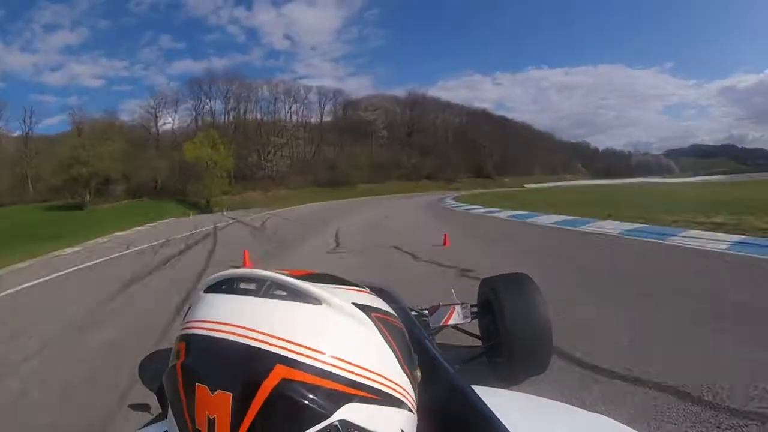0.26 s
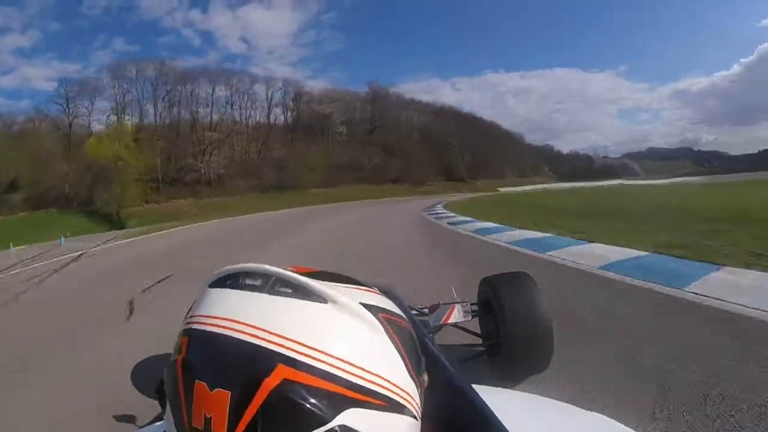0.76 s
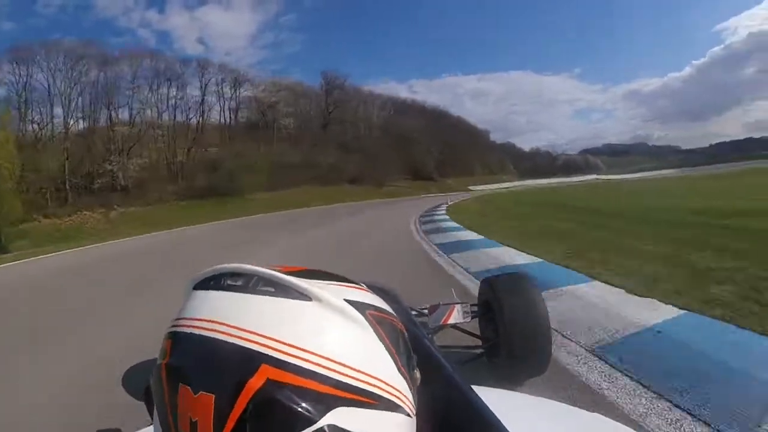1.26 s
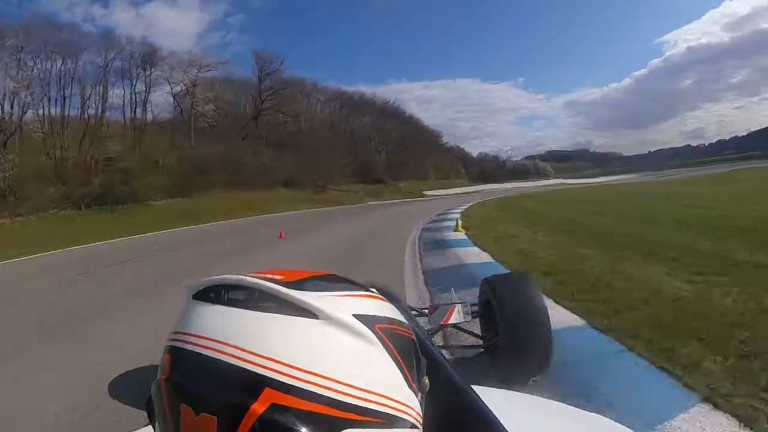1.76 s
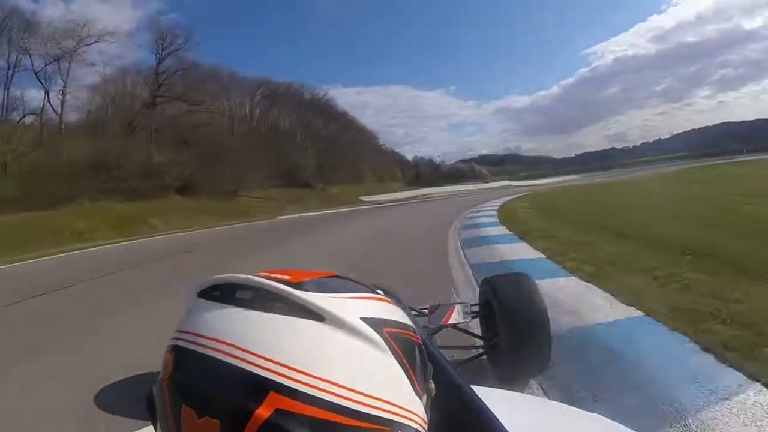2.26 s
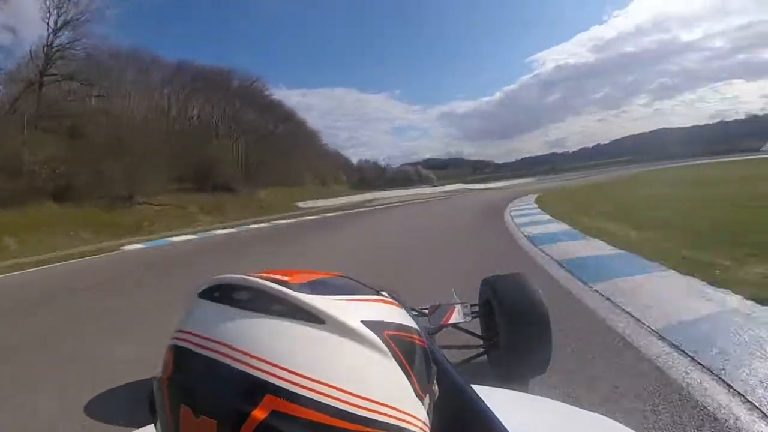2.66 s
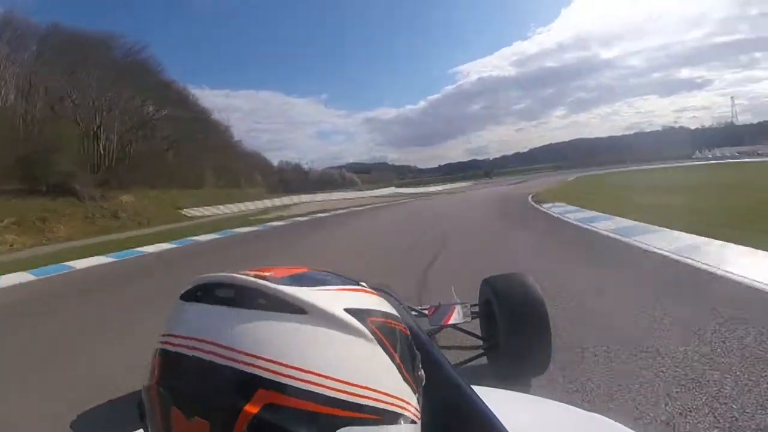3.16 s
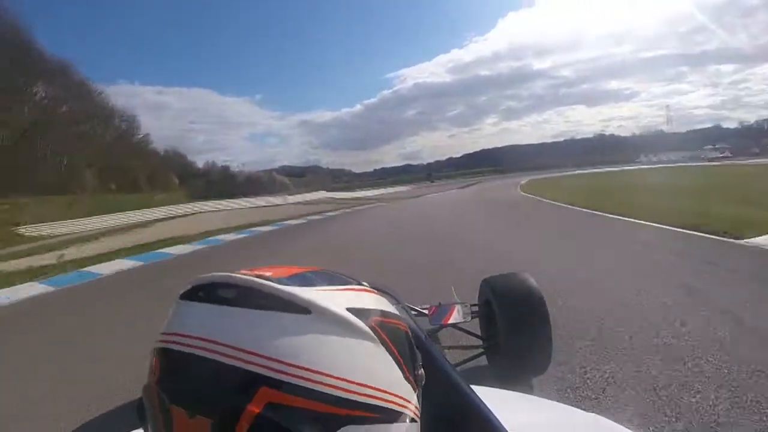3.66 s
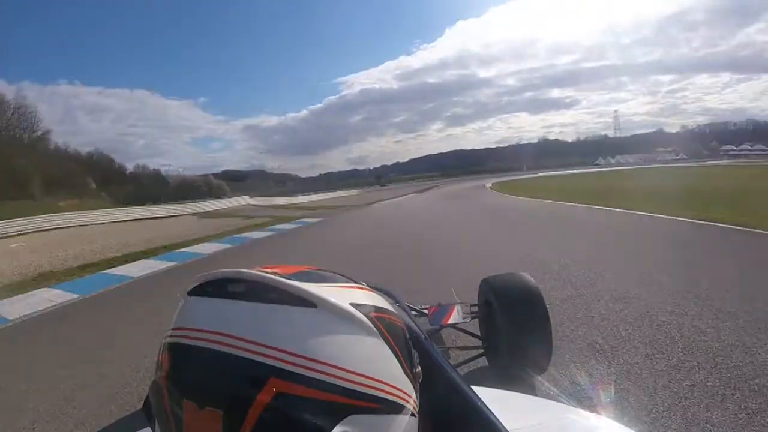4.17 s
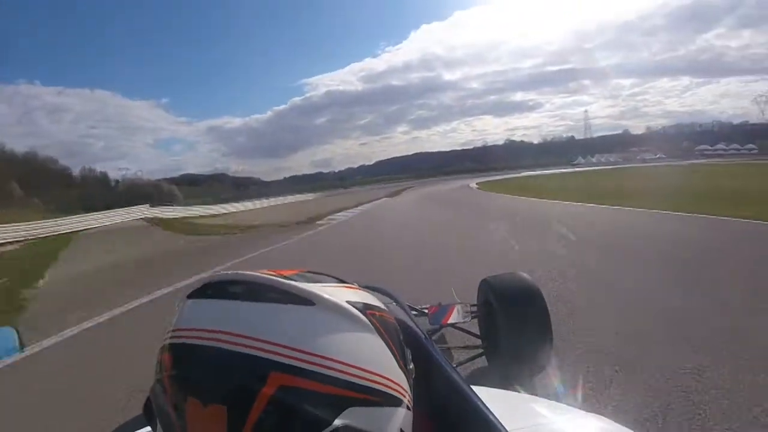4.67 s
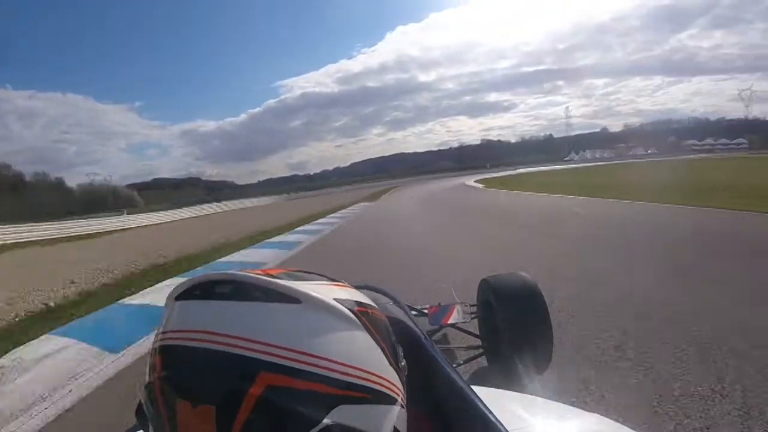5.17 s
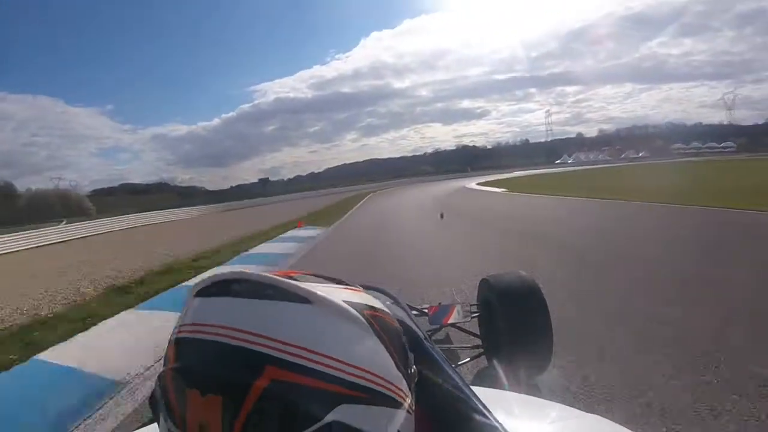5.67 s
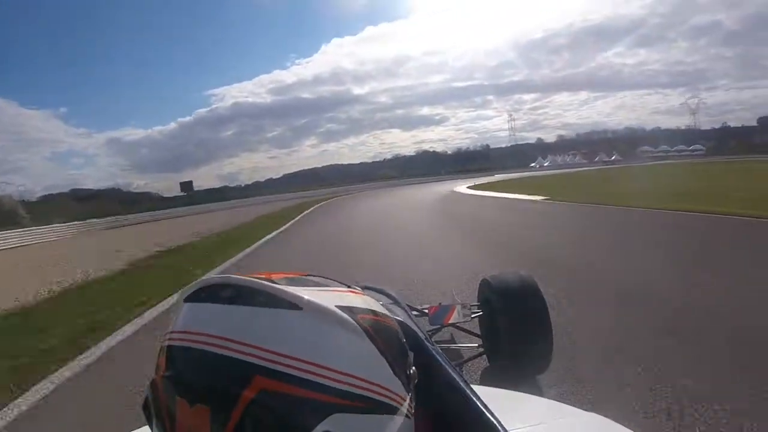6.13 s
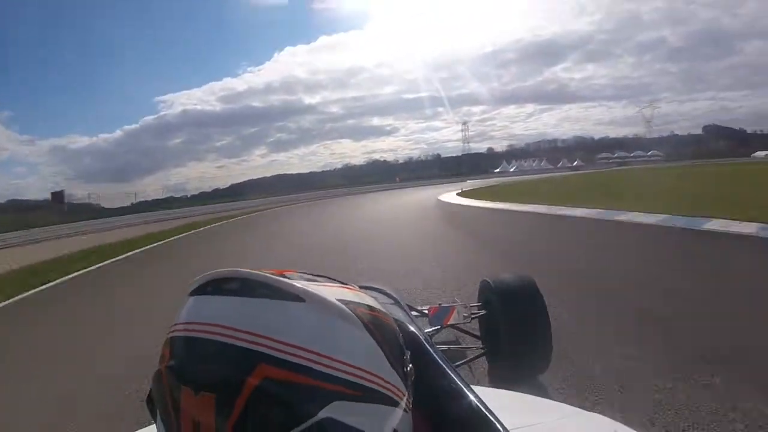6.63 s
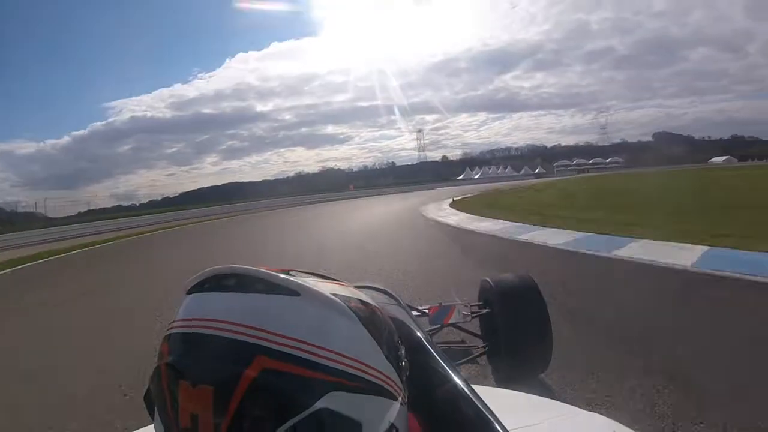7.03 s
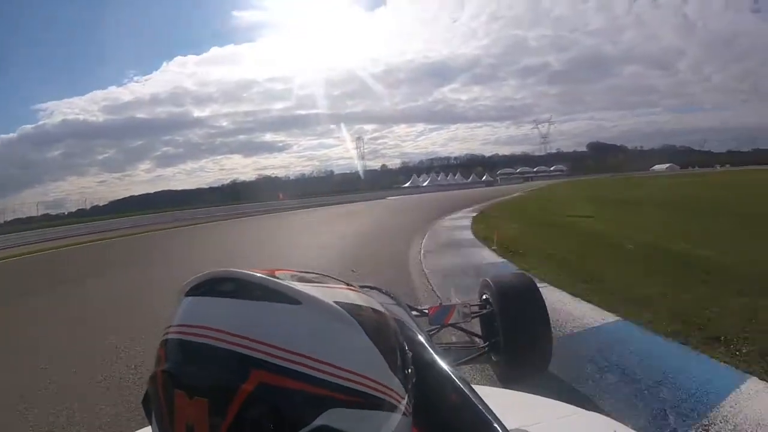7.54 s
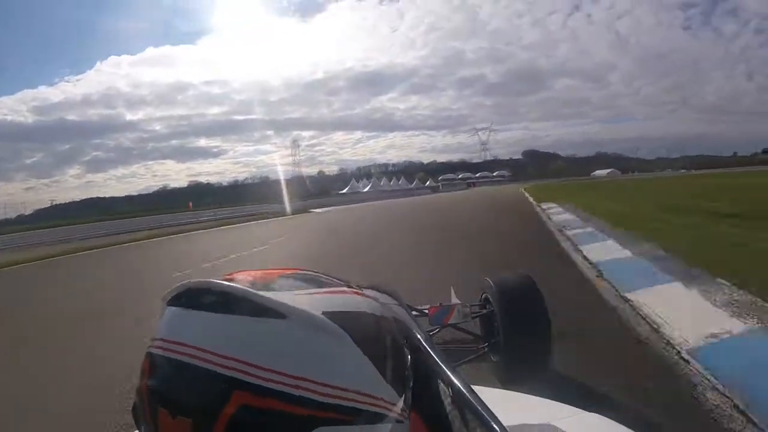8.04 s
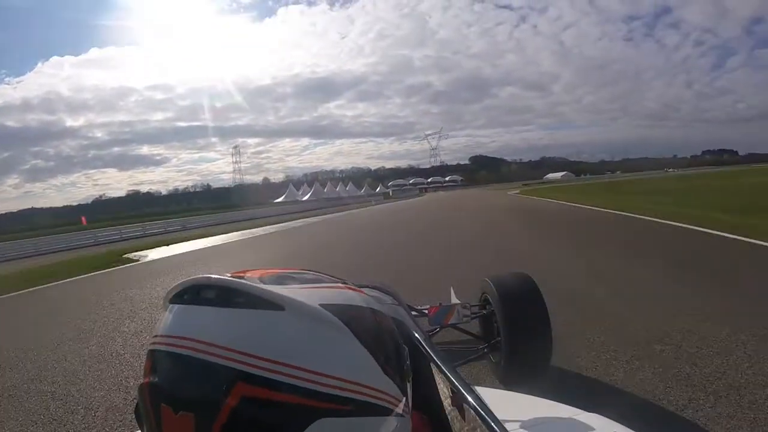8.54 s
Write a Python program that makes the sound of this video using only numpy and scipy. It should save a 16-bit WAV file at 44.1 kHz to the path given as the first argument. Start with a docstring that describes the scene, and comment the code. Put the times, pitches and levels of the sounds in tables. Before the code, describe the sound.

Air tears and buffets past a microphone behind the cockpit of a racing car lapping a circuit. The low engine note sags in a corner amid knocks, small ticks and a faint sizzle of tyre on kerb, then rises with a growl as the car gathers speed. Off the throttle it sinks into a deep, burbling boom for the next bend, before pulling again with a thin gear whine.

```python
"""On board an open-wheel racing car. It starts in a bend: the four-cylinder engine drones, swirling air
tears past the camera housing, tyres scrub and bumps thump the chassis. Short ticks come now and then, a
panel sings at low revs (1 s) and a tyre sizzles on the kerb. The engine growls as the car speeds up.
At 5.5 s the driver lifts off, and the exhaust booms and burbles while the revs fall. Near 7.8 s the
throttle opens again with a short swish, and the growl returns."""
import sys
import numpy as np
from scipy import signal
from scipy.fft import rfft, irfft
from scipy.io import wavfile
from scipy.ndimage import uniform_filter1d, minimum_filter1d

SR = 44100
rng = np.random.default_rng(int(sys.argv[2]) if len(sys.argv) > 2 else 0)


def waveform_to_disk(signal):
    """Save audio, clipped to [-1, 1], as 16-bit WAV at the path in sys.argv[1]."""
    frames = np.transpose(np.atleast_2d(signal))
    scaled = np.clip(frames, -1, 1) * 32767
    samples = np.round(scaled).astype(np.int16)
    wavfile.write(sys.argv[1], SR, samples)


N = 388080
TIME = np.arange(N) / SR

# Engine speed, as firings per second: time_s, firing_hz
ENGINE_SPEED = [(0, 91), (.15, 90.24), (.5, 81.67), (.9, 79.8), (1.35, 79.44), (1.9, 83.26), (2.6, 85.73),
                (3.35, 89.4), (4, 94.6), (4.25, 97.03), (5.32, 107.1), (5.53, 102.4), (5.67, 107.2),
                (5.83, 100.9), (6.1, 98.55), (6.5, 94.64), (7.15, 88.6), (7.8, 86.2), (8.1, 88.25),
                (8.5, 91.05), (8.8, 93.2)]
# The exhaust's deep note, before coasting adds to it: time_s, level_db
BOOM_LEVEL = [(0, -20), (.25, -25.5), (2.3, -24.5), (2.95, -31), (3.15, -20), (3.62, -23), (3.8, -18.5),
              (4.35, -17.7), (4.8, -19.5), (5.5, -18.5), (6.6, -20.5), (7.65, -21), (7.83, -22), (7.9, -26),
              (8.03, -20.5), (8.55, -23), (8.8, -22.5)]
# Presses of the throttle: start_s, end_s, rise_s, fall_s, growl_db, honk_db, rasp_db, flutter_rad
THROTTLE_PULLS = [(-.1, 0.053, 0.092, 0.15, -36.5, -44, -38, .3),
                  (.85, 3.5, 0.82, 0.3, -32.5, -40, -28, 0.62),
                  (3.58, 4.34, 0.14, 1.3, -28.5, -25.5, -30, .25),
                  (7.849, 8.8, 0.079, .2, -32.5, -26, -36, .15)]
# Tones of the growl, before the pipe shapes them: firing_multiple, level_db
GROWL_TONES = [(2.5, -12), (3, 1.5), (3.5, -7.5), (4, -5), (5, -4), (5.5, -11), (6, -4.5), (7, -12),
               (8, -12), (9, -14.5), (13, -15.5)]
# Pitches at which the exhaust pipe rings: pitch_hz, width_hz, gain_db
PIPE_RESONANCES = [(279, 53, 1), (411, 13, -4.5), (514.4, 9.8, 0.5), (570, 27, -3), (656, 52, -6),
                   (1110, 45, -1.5)]
# Tone colour of the gas leaving the pipe: pitch_hz, level_db
GAS_SPECTRUM = [(100, -23.5), (180, -2.5), (280, 0.5), (390, 0), (470, -7), (560, -0.5), (700, -10.5),
                (960, -13.5), (1085, -4), (1160, -13.5), (1235, -8), (1400, -21), (2000, -35)]
# Loudness of the gear whine: time_s, level_db
GEAR_LEVEL = [(0, -42.5), (3, -44.5), (3.9, -36), (4.5, -45), (6, -40), (7.3, -41.5), (8.1, -38.5),
              (8.45, -30.5), (8.8, -28.5)]

# Strength of the air flowing over the car: time_s, level_db
AIRFLOW_LEVEL = [(0, -1.5), (.16, -0.5), (.178, -7.5), (1, -8), (2, -4.5), (3.1, -0.5), (5.1, -1),
                 (5.4, -3), (6.3, -3), (6.9, -7), (7.75, -6), (8.8, -0.5)]
# Gusts and lulls: middle_s, half_length_s, rumble_change_db, buffet_change_db, rush_change_db
WIND_GUSTS = [(0.707, 0.52, 2.5, 0, -2), (1.5, 0.39, -0.5, -1.5, 0), (2.6, .3, -1.5, .5, 1),
              (3.2, 0.13, -2, 2, 1.5), (3.56, 0.17, 5.5, -0.5, 2.5), (4.2, .12, -1.5, -3, 0),
              (4.63, 0.2, -0.5, -1, 1.5), (5.107, 0.15, -3.5, 1, 3.5), (5.62, 0.27, 2.5, 0.5, 2.5),
              (6.4, .35, 2, -0.8, -1), (7.398, 0.52, 0, -2, .8), (8.3, .3, -1, -2.5, 0),
              (8.718, 0.1, 3, 1, 1)]
# Hiss at the front of the housing: time_s, level_db
HISS_LEVEL = [(0, -51), (.16, -57), (.25, -63), (.6, -69), (1, -76), (2, -66), (3, -62.5), (5.2, -61.5),
              (5.7, -54.5), (7.75, -57), (7.95, -50.5), (8.8, -47)]
# Tone colours of the five wind layers, lowest first: pitch_hz, level_db
RUMBLE_SPECTRUM = [(12, -30), (24, -2.5), (38, 5.5), (60, 4), (80, 8), (110, 0.5), (160, -4.5),
                   (300, -43.5)]
BUFFET_SPECTRUM = [(60, -18.5), (120, 1.5), (165, 0), (230, 0), (290, -3.5), (400, -5.5), (520, -8),
                   (700, -13), (1100, -26), (2500, -70.5)]
ROAR_SPECTRUM = [(250, -37), (500, 0.5), (750, 3), (1100, 1), (1600, -3), (2200, -11.5), (3000, -20),
                 (4500, -34), (8000, -74.5)]
RUSH_SPECTRUM = [(1000, -17.5), (1900, 4.5), (2600, 2), (3300, -1.5), (4200, -8), (5100, -5), (5550, -7.5),
                 (5830, -16), (6040, -34), (6250, -16.5), (6520, -8), (7050, -16.5), (8200, -25.5),
                 (9300, -38.5), (10000, -52)]
HISS_SPECTRUM = [(2000, -20), (3600, -9), (4300, -12.5), (5100, -1), (6400, -4.5), (7500, -7), (8500, -17),
                 (9500, -29.5), (11000, -38)]
# Hollows in the bodywork that ring in the wind: pitch_hz, width_hz, level_db
BODY_HOLLOWS = [(402, 24, -38), (520, 16, -44.5), (1070, 79, -52.5)]

# A tyre runs on the kerb: start_s, end_s, rise_s, fall_s, level_db
KERB_TOUCHES = [(1.372, 1.451, 0.054, 0.16, -56), (1.55, 2.95, 0.24, .7, -53)]
# Bumps that jolt the car: time_s, thump_db, knock_db, rattle_db
BUMPS = [(0.108, -5, -12.5, -36), (0.126, -14.5, -23, -45), (.151, -11.5, -12, -45),
         (0.18, -21.5, -29.5, -17.5), (0.214, -23.5, -10, -23), (0.216, -26, -7.5, -26),
         (0.2195, -14.5, -4, -25), (0.613, -7.5, -19, -24), (.677, -35, -31, -26), (0.735, -15, -34, -60),
         (.851, -22.5, -13, -41), (1.149, -33.5, -15, -22), (1.202, -30.5, -30, -23),
         (1.229, -30.5, -18, -27), (1.366, -8.5, -34, -32), (2.126, -8, -24, -43), (4.486, -8, -20, -42),
         (8.052, -13, -15.5, -46)]
# Tone colours of the chassis, the camera mount and the loose parts: pitch_hz, level_db
THUMP_SPECTRUM = [(20, -11.5), (55, -6), (80, 13), (130, -8.5), (400, -16), (1000, -35), (3000, -51)]
KNOCK_SPECTRUM = [(60, -9.5), (200, 9), (700, -4.5), (1500, -14), (3000, -31.5), (5500, -36), (8000, -59)]
RATTLE_SPECTRUM = [(300, -0.5), (1000, 1), (2800, -2), (4200, -13)]
# Short ticks, some faint and very high: time_s, pitch_hz, peak_db
TICKS = [(.784, 2240, -27), (1.777, 2181, -26), (3.863, 6710, -38), (4.331, 7775, -37), (4.692, 1880, -20),
         (6.32, 1780, -22), (6.405, 6470, -42), (6.424, 6440, -38), (6.874, 1993, -26.5)]
# Tones of the singing panel: firing_multiple, level_db
PANEL_OVERTONES = [(7, 0), (10, -17), (13.2, -20), (23.9, -18.5)]
# The swish as the throttle opens: time_s, pitch_hz, level_db
SWISH_PATH = [(7.826, 6600, -62), (7.837, 6500, -41.5), (7.844, 6100, -38.5), (7.853, 5200, -39.5),
              (7.86, 3900, -45), (7.868, 2100, -40), (7.89, 1700, -49)]


def undb(db):
    """Turn decibels into a number to multiply by."""
    return 10 ** (np.asarray(db) / 20)


def unit(x):
    """Scale a signal to an average strength (rms) of 1."""
    return x / np.sqrt(np.mean(x ** 2))


def curves(table):
    """Join a timed table's points with lines: one value per sample for each column."""
    times, *columns = np.transpose(table)
    return [np.interp(TIME, times, column) for column in columns]


def held(start_s, end_s, rise_s, fall_s):
    """A fader from 0 to 1: rises from the start, holds, and falls after the end."""
    return np.clip((TIME - start_s) / rise_s, 0, 1) * np.clip(1 - (TIME - end_s) / fall_s, 0, 1)


def response(spectrum):
    """Turn a tone colour into a gain at every frequency, falling away above its last point."""
    hz, db = np.transpose(spectrum)
    bins = np.arange(N // 2 + 1) * SR / N + 1
    return undb(np.interp(np.log(bins), np.log(hz), db)) * np.minimum(hz[-1] / bins, 1) ** 4


def noise(spectrum):
    """Noise with the given tone colour, strength 1."""
    return unit(irfft(rfft(rng.standard_normal(N)) * response(spectrum), N))


def wander(rate_hz):
    """A smooth random wobble, strength 1, that changes about rate_hz times a second."""
    hz = np.arange(N // 2 + 1) * SR / N
    return unit(irfft(rfft(rng.standard_normal(N)) * np.exp(-(hz / rate_hz) ** 2), N))


def resonance(hz, width_hz):
    """Noise ringing around one pitch, strength 1."""
    bins = np.arange(N // 2 + 1) * SR / N
    return unit(irfft(rfft(rng.standard_normal(N)) / (1 + ((bins - hz) / width_hz) ** 2), N))


def tap(spectrum):
    """The sound of one sharp tap with the given tone colour, peak 1."""
    cepstrum = irfft(np.log(response(spectrum)), N)
    # keeping only the first half packs the energy at the start of the tap
    sound = irfft(np.exp(rfft(2 * cepstrum * (np.arange(N) < N // 2))), N)
    return sound / np.abs(sound).max()


def exhaust_boom(phase, coasting, cover, lumpy):
    """The firings make a deep note that swells off the throttle, more so when the engine cover rings."""
    level_db = curves(BOOM_LEVEL)[0] + coasting * (4.5 + 4.5 * cover)
    level_db += lumpy * np.cos(phase / 4)  # strong and weak cylinders come round every four firings
    level_db += (0.14 + 0.55 * lumpy) * wander(35)
    octave = undb(-25) * np.cos(2 * phase)
    return np.sqrt(2) * (np.sin(phase) + octave) * undb(level_db)


def throttle(shut_growl_db=-48):
    """How much growl, honk, rasp and flutter the pedal brings; the strongest pull wins."""
    growl, honk, rasp, flutter = undb(shut_growl_db), 0, 0, 0
    for *timing, growl_db, honk_db, rasp_db, flutter_rad in THROTTLE_PULLS:
        pedal = held(*timing)
        growl = np.maximum(growl, pedal * undb(growl_db))
        honk = np.maximum(honk, pedal * undb(honk_db))
        rasp = np.maximum(rasp, pedal * undb(rasp_db))
        flutter = np.maximum(flutter, pedal * flutter_rad)
    return growl, honk, rasp, flutter


def intake_honk(phase):
    """The air intake honks at twice the firing rate."""
    return np.sqrt(2) * np.sin(2 * phase + 0.09 * wander(7.6))


def exhaust_growl(phase, firing_hz, flutter_rad):
    """Wavering overtones of the firings; each swells as the revs carry it through a pipe resonance."""
    out = np.zeros(N)
    for multiple, db in GROWL_TONES:
        strength = np.sqrt(2) * undb(db + 1.4 * wander(5.9))
        tone = np.cos(multiple * phase + (0.1 + flutter_rad) * wander(14))
        pipe = sum(undb(gain_db) / (1 + ((multiple * firing_hz - hz) / width_hz) ** 2)
                   for hz, width_hz, gain_db in PIPE_RESONANCES)
        out += strength * tone * pipe
    return out


def exhaust_gas(phase, pulsing=0.91):
    """Each firing lets out a noisy puff of gas."""
    return unit(noise(GAS_SPECTRUM) * np.exp(pulsing * np.cos(phase)))


def gear_whine(phase, multiple=4.25):
    """The gears turn with the engine, so their whine follows the revs."""
    return np.sqrt(2) * np.cos(multiple * phase + 0.16 * wander(14)) * undb(curves(GEAR_LEVEL)[0])


def engine(phase, firing_hz, cover_hz=87.6, cover_width_hz=5.1, burble_db=-34.5):
    """The engine honks, growls and rasps when pulling; when coasting it booms more and burbles."""
    coasting = held(start_s=5.48, end_s=7.735, rise_s=0.19, fall_s=0.2)
    cover = 1 / (1 + ((firing_hz - cover_hz) / cover_width_hz) ** 2)  # 1 where the engine cover rings
    lumpy = coasting * (1 - cover)  # off the throttle the firings are lumpy until the revs settle
    growl_gain, honk_gain, rasp_gain, flutter_rad = throttle()
    boom = exhaust_boom(phase, coasting, cover, lumpy)
    honk = intake_honk(phase) * honk_gain
    growl = exhaust_growl(phase, firing_hz, flutter_rad) * growl_gain
    unevenness = undb(wander(49))  # no two firings are equally strong
    gas = exhaust_gas(phase) * (rasp_gain + undb(burble_db) * lumpy)
    return boom + (honk + growl + gas) * unevenness


def wind():
    """Big swirls of air rumble and buffet the housing, small ones roar and hiss, and hollows ring."""
    flow_db, = curves(AIRFLOW_LEVEL)
    rumble_db = -22 + 0.38 * flow_db
    buffet_db = -22 + 0.83 * flow_db
    roar_db = -28 + flow_db
    rush_db = -36.5 + flow_db
    rush_db -= np.interp(TIME, [5.38, 5.72], [0, 9.5])  # fades as the car turns into the second bend
    for middle_s, half_length_s, low_db, middle_db, high_db in WIND_GUSTS:
        gust = np.exp(-((TIME - middle_s) / half_length_s) ** 2)
        rumble_db += low_db * gust
        buffet_db += middle_db * gust
        roar_db += 0.25 * high_db * gust
        rush_db += high_db * gust
    swirls = 0.89 * wander(28) + 0.9 * wander(220)  # shared, so four layers flicker together
    rumble = noise(RUMBLE_SPECTRUM) * undb(rumble_db + 2.1 * wander(30))
    buffet = noise(BUFFET_SPECTRUM) * undb(buffet_db + 1.3 * swirls + 0.5 * wander(12))
    roar = noise(ROAR_SPECTRUM) * undb(roar_db + 0.9 * swirls + 0.18 * wander(40))
    rush = noise(RUSH_SPECTRUM) * undb(rush_db + 0.73 * swirls + 0.32 * wander(40))
    hiss = noise(HISS_SPECTRUM) * undb(curves(HISS_LEVEL)[0] + 0.5 * swirls + 1.5 * wander(18))
    hollows = sum(undb(db) * resonance(hz, width_hz) for hz, width_hz, db in BODY_HOLLOWS)
    hollows *= undb(0.78 * (flow_db - flow_db.mean()))
    return rumble + buffet + roar + rush + hiss + hollows


def noise_band(hz, width_hz):
    """A tone shaken at random until it blurs into a band of noise."""
    return np.sqrt(2) * wander(width_hz) * np.sin(2 * np.pi * hz * TIME)


def tyres(mid_bend_s=1.7):
    """The loaded tyres scrub through the bend and sizzle on the painted kerb, in uneven spurts."""
    # the scrub eases by 1 dB a second up to the middle of the bend, then by 14 dB a second
    scrub_db = -48 - np.maximum(TIME - mid_bend_s, 14 * (TIME - mid_bend_s))
    scrub_top = undb(scrub_db - 11)  # the scrub has a thin sizzle of its own
    on_kerb = sum(undb(db) * held(*timing) for *timing, db in KERB_TOUCHES)
    scrub = noise_band(hz=2288, width_hz=330) * undb(scrub_db + 1.2 * wander(25))
    sizzle = noise_band(hz=5050, width_hz=350) * (on_kerb + scrub_top) * undb(2 * wander(22))
    return scrub + sizzle


def bumps(rattle_rise_s=0.00045, rattle_decay_s=0.0017):
    """Each bump thumps the chassis, knocks the camera mount and rattles loose parts."""
    padding = signal.windows.hann(25)  # the padded mount spreads each knock over half a millisecond
    knock = signal.lfilter(padding / padding.sum(), 1, tap(KNOCK_SPECTRUM))
    thump = tap(THUMP_SPECTRUM)
    rattle_noise = noise(RATTLE_SPECTRUM)
    fade = np.tanh(TIME / rattle_rise_s) ** 2 * np.exp(-np.minimum(TIME / rattle_decay_s, 20))
    out = np.zeros(N)
    for time_s, thump_db, knock_db, rattle_db in BUMPS:
        start = int(time_s * SR)
        rattle = fade * np.roll(rattle_noise, start)
        blow = undb(thump_db) * thump + undb(knock_db) * knock + undb(rattle_db) * rattle
        out[start:] -= blow[:N - start]
    return out


def ticks(width_hz=1000, rise_s=0.00035, decay_s=0.0022):
    """Short ticks, some faint and very high: each is a tiny burst of noise around one pitch."""
    out, age = np.zeros(N), TIME[:SR // 20]
    fade = np.tanh(age / rise_s) * np.exp(-age / decay_s)
    roughness = wander(width_hz)
    for time_s, hz, peak_db in TICKS:
        start = int(time_s * SR)
        span = slice(start, start + len(age))
        tick = fade * roughness[span] * np.sin(2 * np.pi * hz * age)
        out[span] += undb(peak_db) * tick / np.abs(tick).max()
    return out


def singing_panel(phase, level_db=-30.4, chatter_rad=0.045):
    """A panel sings along briefly at the lowest revs; it chatters, so its tones are never steady."""
    shaky_phase = phase + chatter_rad * wander(60)
    tones = sum(undb(db) * np.sin(multiple * shaky_phase) for multiple, db in PANEL_OVERTONES)
    fade = held(start_s=0.99, end_s=1.24, rise_s=0.08, fall_s=0.06)
    return np.sqrt(2) * tones * fade * undb(level_db + 1.5 * wander(30))


def throttle_swish(width_hz=2700):
    """A short airy band of noise that falls in pitch as the throttle opens."""
    hz, db = curves(SWISH_PATH)
    sounding = (TIME > SWISH_PATH[0][0]) & (TIME < SWISH_PATH[-1][0])
    falling_tone = np.sin(2 * np.pi * np.cumsum(hz) / SR)
    return np.sqrt(2) * wander(width_hz) * falling_tone * undb(db) * sounding


def scene():
    """Everything reaches one microphone behind the cockpit."""
    firing_hz, = curves(ENGINE_SPEED)
    phase = 2 * np.pi * np.cumsum(firing_hz * (1 + 0.0018 * wander(8.8))) / SR  # one turn per firing
    machinery = engine(phase, firing_hz) + gear_whine(phase) + singing_panel(phase)
    return (machinery + wind() + tyres() + bumps() + ticks() + throttle_swish())[None]


def record(dry, ceiling_db=-4.6, window_samples=221, top_hz=10000):
    """The camera turns down the loudest peaks, then cuts the highest treble."""
    needed_gain = np.minimum(undb(ceiling_db) / (np.abs(dry) + 1e-9), 1)
    smooth_gain = uniform_filter1d(minimum_filter1d(needed_gain, window_samples), window_samples)
    treble_cut = signal.ellip(8, 0.2, 70, top_hz, fs=SR, output="sos")
    return signal.sosfilt(treble_cut, dry * smooth_gain)


dry = scene()
out = record(dry)
waveform_to_disk(out)
```